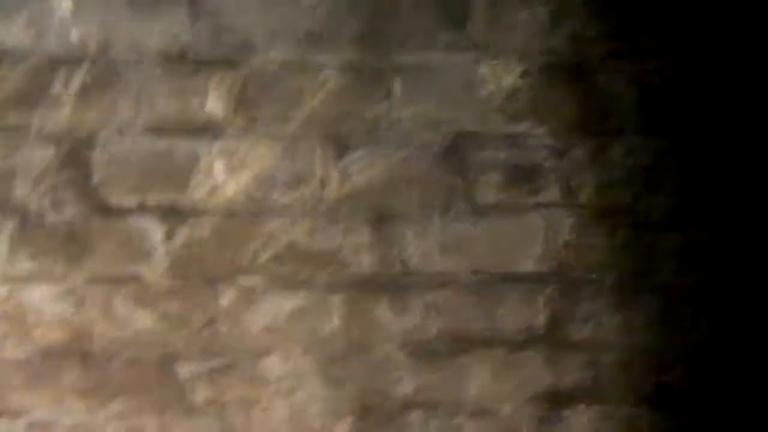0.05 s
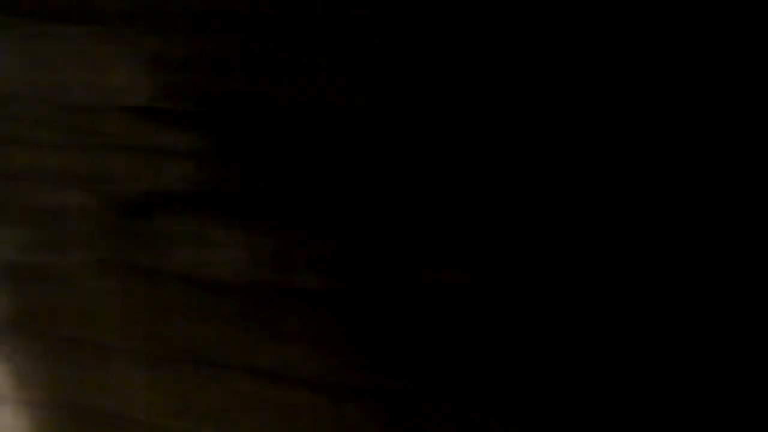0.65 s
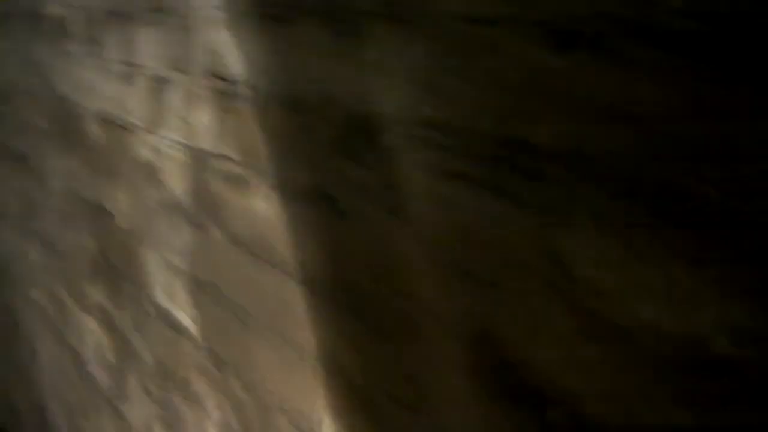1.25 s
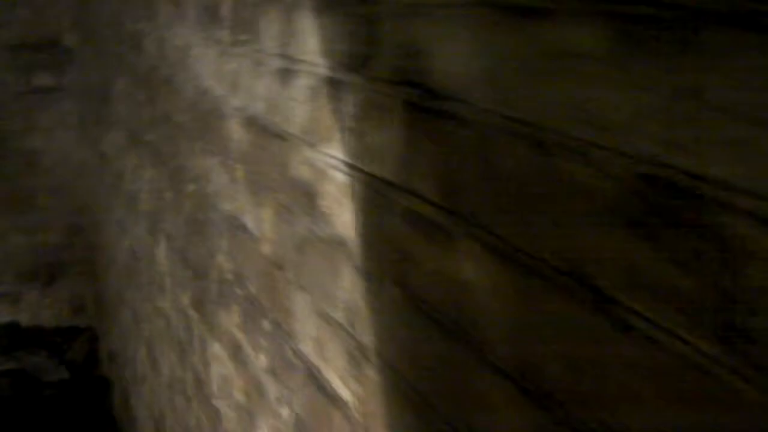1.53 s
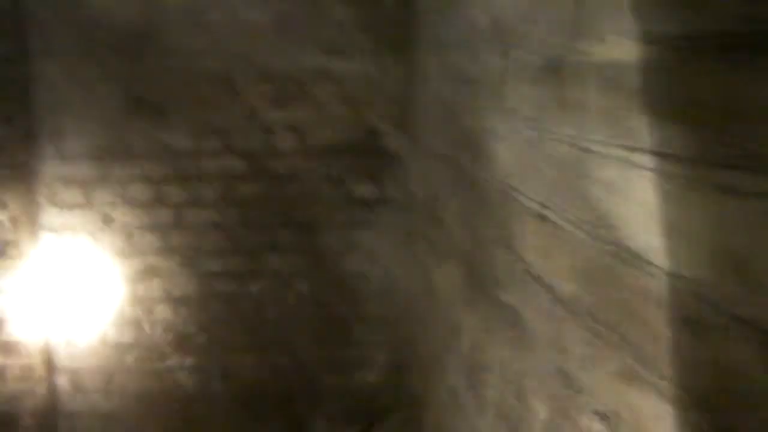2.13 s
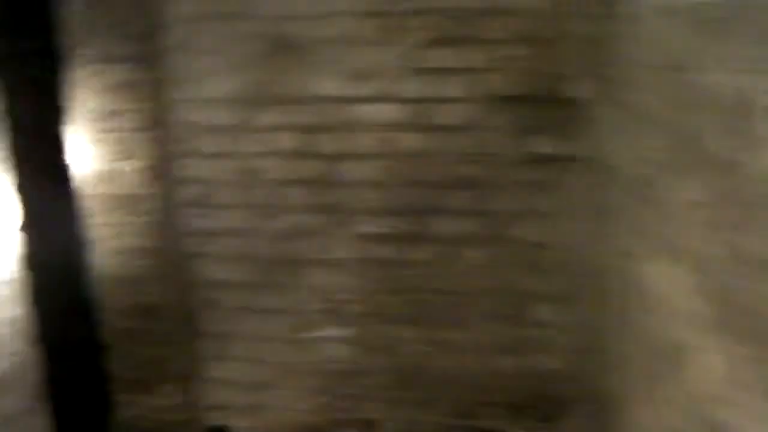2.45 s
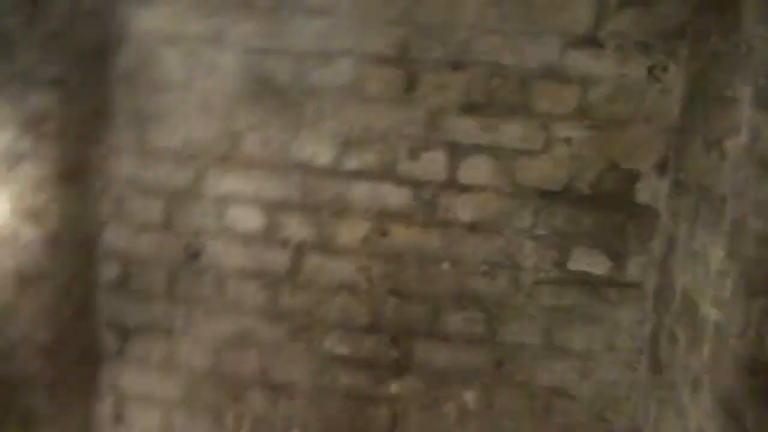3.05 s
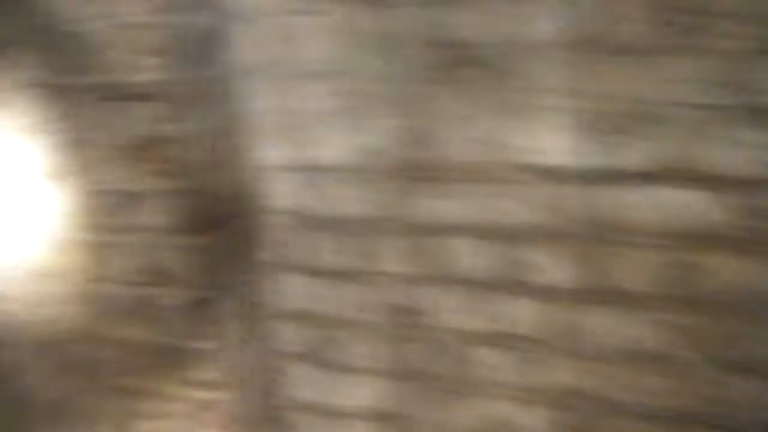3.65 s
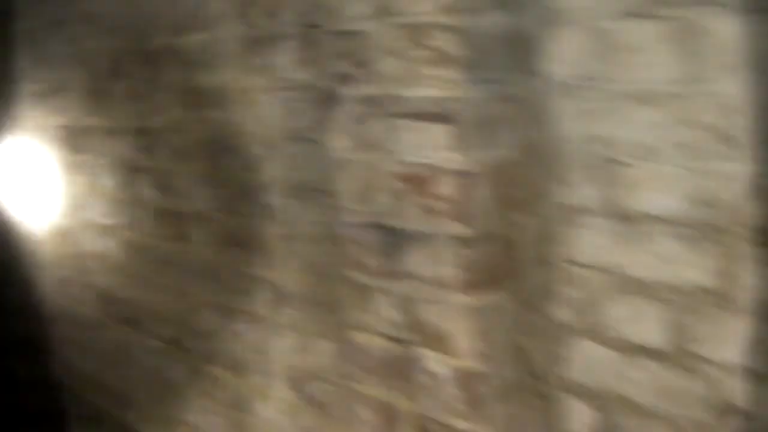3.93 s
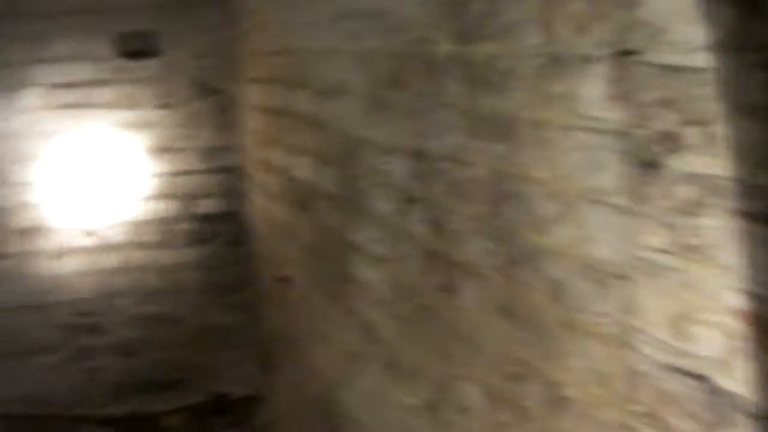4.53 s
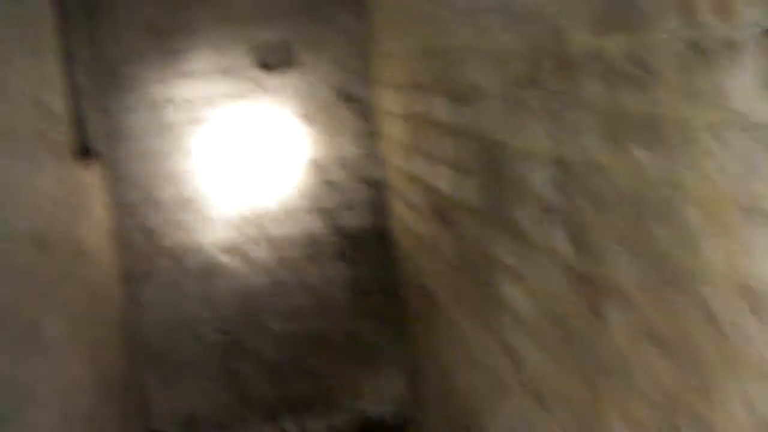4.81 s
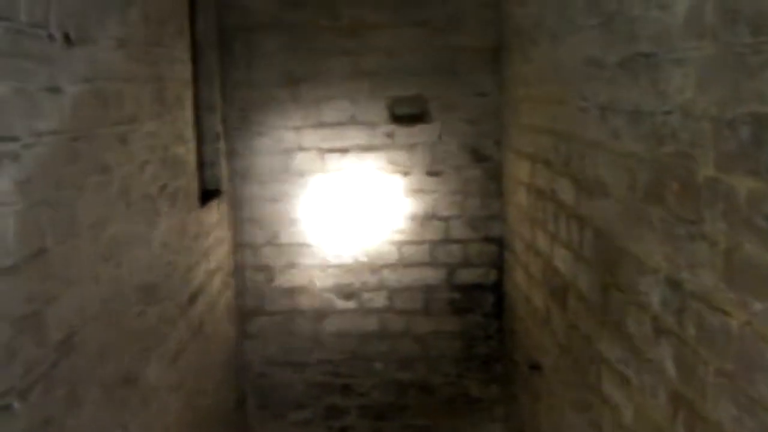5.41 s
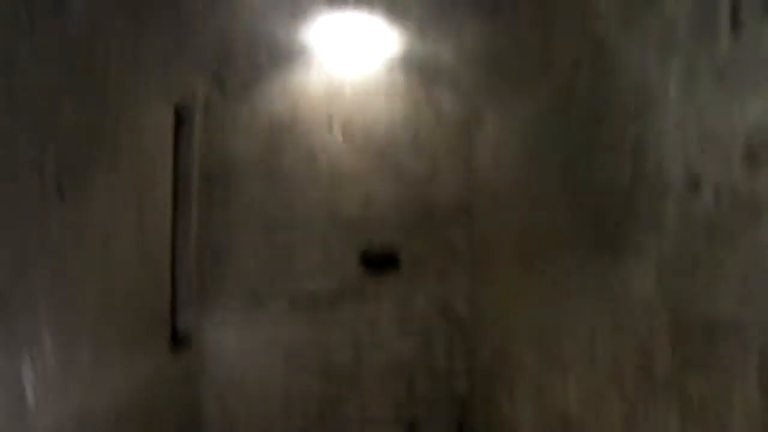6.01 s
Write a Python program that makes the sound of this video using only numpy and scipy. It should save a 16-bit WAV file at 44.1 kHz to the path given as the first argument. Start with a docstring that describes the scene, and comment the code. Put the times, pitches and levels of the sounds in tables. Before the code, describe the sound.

Shoes crush grit and thud softly in an echoing brick passage, a loose brick clacking once among faint knocks and hiss.

```python
"""A slow walk over a gritty floor in a narrow brick tunnel, with faint hiss throughout.
Dull knocks sound first, close to the hand-held microphone. Soles crush the grit, grains snap, shifting
weight rumbles and a hollow hum comes and goes. From 1.5 s the soles also rasp and thud; at 1.8 s a
loose brick clacks once. The steps are heaviest from 2 to 5 s, then lighten as the knocks return.
The vault rings after every step."""
import sys
import numpy as np
from scipy import signal
from scipy.io import wavfile

SR = 44100
rng = np.random.default_rng(int(sys.argv[2]) if len(sys.argv) > 2 else 0)


def to_wav(sig):
    """Store sig (one row per channel, or 1-D mono) as 16-bit WAV at the path in sys.argv[1].

    Samples outside -1..1 are clipped; the rate is SR.
    """
    pcm = np.clip(np.atleast_2d(sig), -1, 1) * 32767
    pcm = np.round(pcm).astype(np.int16)
    wavfile.write(sys.argv[1], SR, pcm.T)  # frames by channels


N = 276066
TIME_S = np.arange(N) / SR
BAND_EDGES_HZ = 22 * 2 ** np.arange(0, 10, .5)

# Stereo image. Each row: frequency in Hz, left-right correlation.
CORRELATION = [(40, 0.73), (300, 0.94), (700, 0.89), (1400, 0.83), (2800, 0.5), (5500, 0.13),
               (10000, -0.017), (15000, 0.0076)]
# Faint steady background hiss, with a dip near 7.9 kHz. Each row: frequency in Hz, relative density in dB.
HISS_SPECTRUM = [(15, -34), (25, 1), (77, 4.5), (260, -12.5), (433, -1), (762, -9.5), (1300, -13),
                 (1530, -13), (4260, -16.5), (7300, -19.5), (7910, -24.5), (11800, -14.5), (15500, -25)]
# Spectra of a step's three parts. Each row: frequency in Hz, relative density in dB.
WEIGHT_SPECTRUM = [(25, -28), (60, -7.5), (100, -5), (150, -1.5), (220, -3), (300, -4), (420, 4),
                   (600, -4.5), (900, -12), (2000, -29)]
SCUFF_SPECTRUM = [(250, -13.5), (500, -3), (850, -0.5), (1300, -1), (2000, -6), (3200, -11.5),
                  (5000, -13.5), (10000, -41)]
CRUNCH_SPECTRUM = [(1200, -51), (2500, 1.5), (4000, -4.5), (6000, -1), (9000, -5), (13000, -5.5),
                   (16000, -26)]
# Soft contacts. Each row: start in seconds, relative level in dB, pitch in Hz, rise in cycles.
CLOSE_KNOCKS = [(.106, -43.5, 470, 1.1), (.124, -44, 645, 1.14), (.514, -46, 390, 0.91),
                (1.066, -40.5, 555, 0.72), (1.285, -37.5, 730, 0.91), (1.293, -31.5, 452, 1.1),
                (1.303, -35.5, 467, 2.4), (1.359, -39, 474, 0.55), (5.432, -41.5, 660, .5),
                (5.475, -44.5, 187, 1.1), (5.477, -33, 395, 1.15), (5.536, -35.5, 600, 0.42),
                (5.544, -34.5, 537, 0.61), (5.879, -38, 590, 0.93), (5.888, -41, 318, 1.2),
                (5.895, -47, 192, 1.24)]
FOOT_THUDS = [(1.561, -28.5, 998, 1.9), (2.163, -27.5, 740, 4.1), (2.271, -25.5, 450, 0.55),
              (2.338, -35, 167, 0.79), (2.762, -38.5, 740, 0.85), (2.922, -27.5, 930, 3.6),
              (2.983, -28.5, 411, 3.2), (3.016, -27.5, 537, 3.1), (3.320, -30, 970, 1.5),
              (3.560, -24, 486, 1.74), (3.593, -23, 223, 0.38), (3.805, -34.5, 460, 1.1),
              (3.926, -31.5, 860, 0.84), (4.079, -28.5, 156, 1.5), (4.082, -26.5, 332, 2.9),
              (4.704, -39, 690, 2.1), (4.786, -30, 630, 2), (4.795, -26, 906, 4), (4.891, -27, 880, 2.2),
              (6.069, -39.5, 667, 1.3)]
# Tunnel tail. Each row: frequency in Hz, T60 in seconds.
TAIL_T60 = [(100, 0.78), (400, 1), (900, 0.58), (2000, 0.5), (5000, 0.45), (14000, 0.88)]
# Standing waves and wall flutter. Each row: frequency in Hz, relative level in dB, T60 in seconds.
VAULT_MODES = [(71.4, 11.5, 0.75), (142.3, 10, 0.5), (153, 2.5, 0.36), (395, -8, 0.56), (440, -20, 0.84),
               (559, -5.5, 0.15), (637, -10, 0.18), (840, -7, 0.1), (1205, -11, 0.086), (1330, -29, 0.48),
               (1950, -9, 0.16), (2070, -15, 0.11), (2950, -15, .08), (3086, -3.5, 0.046),
               (3390, -12, 0.065), (3680, -4, 0.12), (4130, 0, 0.06), (4690, 1.5, 0.082),
               (5570, -1.5, 0.15)]
# Feet shifting between treads. Each row: time in seconds, relative level in dB.
FOOT_SHUFFLE = [(0, -87), (.7, -69.5), (1.1, -62.5), (2.1, -59), (3.4, -58), (4.3, -62), (4.6, -77),
                (5.2, -60.5), (5.85, -66), (6.26, -66)]
# A sole presses into the grit. Each row: time of full load, 20 dB attack and 20 dB release in seconds,
# then relative levels of weight, scuff and crunch in dB.
SOLE_TREADS = [(0.354, 0.041, 0.061, -56, -57.5, -49.5), (.51, 0.15, 0.16, -58.5, -63.5, -63),
               (0.819, 0.084, 0.65, -51, -58, -55.5), (1.072, 0.019, 0.024, -68, -53, -55),
               (1.3, 0.054, 0.069, -54, -75, -61), (1.562, 0.073, 0.078, -43, -47.5, -51),
               (1.695, 0.044, 0.072, -57, -65, -50), (1.805, 0.085, 0.31, -46.5, -50.5, -50),
               (2.168, 0.055, .11, -33, -34, -40), (2.28, 0.056, 0.35, -41, -47, -73),
               (2.36, 0.073, 0.41, -45.5, -54, -52), (2.765, 0.009, 0.13, -41.5, -52.5, -62),
               (2.839, 0.065, 0.09, -43.5, -46, -46.5), (2.929, 0.047, 0.16, -30, -35.5, -42),
               (3.09, 0.23, 0.1, -41, -45, -49), (3.234, 0.072, 0.12, -43, -45.5, -50),
               (3.323, 0.023, 0.092, -40.5, -45.5, -43), (3.557, 0.015, .15, -36, -39.5, -47.5),
               (3.647, 0.072, .14, -36.5, -43.5, -43), (3.931, 0.02, 0.031, -45.5, -45, -50),
               (4.072, 0.022, 0.051, -41.5, -47.5, -55), (4.19, 0.11, 0.23, -46, -44, -38.5),
               (4.255, 0.06, 0.095, -54, -51, -44), (4.335, 0.12, 0.16, -46.5, -60.5, -74),
               (4.635, .02, 0.036, -87, -57.5, -55.5), (4.716, 0.032, 0.45, -43, -55, -44),
               (4.786, 0.076, 0.11, -34, -38.5, -41.5), (4.894, 0.035, 0.12, -54, -42.5, -41),
               (5.0, .06, 0.14, -58, -48, -47.5), (5.07, .03, 0.19, -53, -58, -61.5),
               (5.55, 0.11, .2, -55, -63, -58), (5.68, 0.17, 0.12, -73, -64.5, -58.5),
               (6.072, 0.027, 0.081, -49, -54, -61.5), (6.245, 0.11, .1, -58, -62, -85)]
# Larger grains breaking. Each row: start in seconds, relative level in dB, pitch in Hz,
# decay time in seconds, bandwidth in octaves.
GRAIN_SNAPS = [(0.351, -37, 5400, 0.0012, 2.2), (.953, -37, 4700, 0.0053, 0.43),
               (.9535, -40.5, 2200, 0.0042, .7), (1.473, -38.5, 1990, .002, .9),
               (1.693, -34.5, 4940, 0.0011, 2.1), (2.158, -27.5, 3280, .001, .66),
               (2.1716, -23, 3740, .001, 0.33), (2.368, -39, 7000, 0.0028, 2.1),
               (2.421, -38.5, 7800, .0022, 1.6), (2.484, -38, 7500, 0.0029, 1.1),
               (2.937, -33.5, 3000, .0027, 1.6), (3.0638, -25.5, 2280, 0.0018, 0.54),
               (3.087, -30.5, 3700, 0.0023, .9), (3.1058, -24.5, 2270, .0012, 0.43),
               (3.195, -39.5, 4380, 0.0061, 0.48), (3.319, -45, 6500, .017, 2.6),
               (3.558, -27, 3430, 0.00055, 0.23), (3.6393, -17.5, 4100, 0.0013, 1.15),
               (3.643, -21, 5000, 0.0033, 0.85), (3.6499, -23, 2380, 0.0062, 2.4),
               (3.916, -38.5, 6500, .003, .94), (4.070, -41.5, 3150, 0.01, 1.5),
               (4.366, -39.5, 7000, .0022, 1.4), (4.43, -33, 5800, 0.0011, 1.8),
               (5.030, -27.5, 3300, .0009, 1.4)]
# Swelling resonances. Each row: time of peak in seconds, relative level in dB, pitch in Hz.
WEIGHT_RUMBLES = [(.86, -55, 82), (1.66, -58, 133), (2.23, -45, 126), (3.0, -42.5, 150), (4.195, -45, 117),
                  (4.31, -53, 80), (6.07, -54.5, 99)]
HOLLOW_HUMS = [(1.38, -57, 440), (3.42, -51.5, 145), (5.2, -61, 395), (5.38, -56.5, 410)]
SOLE_RASPS = [(1.51, -58, 2650), (2.865, -52, 7300), (3.16, -53, 2150), (3.24, -57, 4600),
              (3.335, -51, 2520), (3.345, -55, 6100), (3.567, -51, 9000), (4.2, -48, 4300),
              (4.247, -41, 2010), (4.45, -48.5, 1040), (4.775, -45.5, 3830), (4.815, -43.5, 3700),
              (4.9, -45.5, 3550), (5.0, -51.5, 3740)]
# Loose brick. Each row: mode frequency in Hz, relative level in dB, T60 in seconds.
BRICK_MODES = [(223, -21, 0.2), (315, -19.5, 0.24), (450, -6, 0.019), (615, -14, 0.1), (737, -7.5, 0.038),
               (874, -5.5, 0.037), (1040, 3, 0.0088), (1177, -6.5, 0.047), (1370, 0.5, 0.014),
               (1470, -28, 0.087), (1967, -18, 0.096), (2080, 4, 0.0034), (2270, -11.5, 0.047),
               (2650, -9.5, 0.011), (3050, -13.5, 0.0092), (3320, -24.5, 0.059), (4000, -16, 0.0083)]


def from_db(db):
    return 10 ** (np.asarray(db) / 20)


def unit_rms(x):
    return x / np.sqrt(np.mean(x ** 2) + 1e-20)


def at_hz(table, hz):
    """Interpolate on a log-frequency axis."""
    points_hz, values = np.transpose(table)
    return np.interp(np.log(hz), np.log(points_hz), values)


def add(track, start_s, sound):
    i = max(0, round(start_s * SR))
    track[..., i:i + sound.shape[-1]] += sound[..., :N - i]


def bandpass(x, low_hz, high_hz):
    sos = signal.butter(2, [low_hz, min(high_hz, .45 * SR)], "band", fs=SR, output="sos")
    return signal.sosfilt(sos, x + 1e-18)


def highpass(x, hz):
    return signal.sosfilt(signal.butter(2, hz, "high", fs=SR, output="sos"), x + 1e-18)


def stereo_bands(noise):
    """Yield centre in Hz and stereo signal per half octave, from two mid-side pairs."""
    for k, (low_hz, high_hz) in enumerate(zip(BAND_EDGES_HZ, BAND_EDGES_HZ[1:])):
        mid, side = bandpass(noise[k % 2], low_hz, high_hz)
        hz = np.sqrt(low_hz * high_hz)
        alike = at_hz(CORRELATION, hz)
        yield hz, np.sqrt((1 + alike) / 2) * mid + np.sqrt((1 - alike) / 2) * side * [[1], [-1]]


def coloured(noise, spectrum):
    """Shape white noise to a stereo spectrum at about the same rms."""
    centres_hz = np.sqrt(BAND_EDGES_HZ[1:] * BAND_EDGES_HZ[:-1])
    power = np.sum(from_db(at_hz(spectrum, centres_hz)) ** 2 * np.diff(BAND_EDGES_HZ)) * 2 / SR
    return sum(from_db(at_hz(spectrum, hz)) * band for hz, band in stereo_bands(noise)) / np.sqrt(power)


def ringing_noise(hz, octaves, samples):
    """Noise in one resonance, wider in stereo with pitch; rms 1."""
    mid, side = rng.standard_normal((2, samples + 2048))
    stereo = mid + min(hz / 7000, 1) * side * [[1], [-1]]
    edge_ratio = 2 ** (octaves / 2)
    return unit_rms(bandpass(stereo, hz / edge_ratio, hz * edge_ratio)[:, -samples:])


def swells(table, sigma_s, octaves):
    """Resonant noise under Gaussian envelopes."""
    out, t = np.zeros((2, N)), TIME_S[:SR // 2]
    for peak_s, db, hz in table:
        start_s = max(0, peak_s - .25)
        envelope = np.exp(-.5 * ((start_s + t - peak_s) / sigma_s) ** 2)
        add(out, start_s, from_db(db) * ringing_noise(hz, octaves, len(t)) * envelope)
    return out


def soft_blows(table, overtone_ratio, overtone_db, rattle_gain):
    """Soft contacts swell and die within cycles, with one overtone and some rattle."""
    out, t = np.zeros(N), TIME_S[:SR // 8]
    for start_s, db, hz, rise_cycles in table:
        rise_s = rise_cycles / hz
        overtone = np.sin(2 * np.pi * overtone_ratio * hz * t) * np.exp(-t / (2 * rise_s))
        body = np.sin(2 * np.pi * hz * t) + from_db(overtone_db) * overtone
        rattle = unit_rms(bandpass(rng.standard_normal(len(t)), hz / 2, hz * 1.54))
        envelope = t / rise_s * np.exp(1 - t / rise_s)
        add(out, start_s, from_db(db) * highpass((body + rattle_gain * rattle) * envelope, hz / 2))
    return out


def hiss(level_db=-61):
    """Faint steady background noise."""
    return from_db(level_db) * coloured(rng.standard_normal((2, 2, N)), HISS_SPECTRUM)


def knocks():
    """Dull contacts close to the microphone."""
    return soft_blows(CLOSE_KNOCKS, overtone_ratio=1.68, overtone_db=-10, rattle_gain=.32)


def tunnel(x, early_db=-7, early_t60_s=.16, late_db=-11):
    """Near walls return a dense cluster; a longer tail and standing waves follow."""
    t, response = TIME_S[:SR], np.zeros((2, SR))
    for hz, band in stereo_bands(rng.standard_normal((2, 2, SR))):
        early = from_db(early_db) * unit_rms(from_db(-60 * t / early_t60_s))
        late = from_db(late_db) * unit_rms(from_db(-60 * t / at_hz(TAIL_T60, hz)))
        response += band * np.hypot(early, late) * (t > .003) / np.sqrt(SR)
    for hz, db, t60_s in VAULT_MODES:
        mode = from_db(db - 60 * t / t60_s) * np.cos(2 * np.pi * hz * t)
        response += mode * 2 * np.log(1000) / (t60_s * SR)   # gain at resonance independent of T60
    return signal.fftconvolve(x[None], response, axes=1)[:, :N]


def tread_loads(settle_db=-23, settle_20db_s=.53):
    """Weight, scuff and crunch gains: each tread swells, lets go and leaves the grit settling."""
    shuffle_db = np.interp(TIME_S, *np.transpose(FOOT_SHUFFLE))
    power = from_db(shuffle_db + np.array([[-2.5], [-3.5], [-4.5]])) ** 2
    for peak_s, attack_s, release_s, *parts_db in SOLE_TREADS:
        before_s, after_s = np.maximum(peak_s - TIME_S, 0), np.maximum(TIME_S - peak_s, 0)
        rise = from_db(-20 * before_s / attack_s)
        release = from_db(-20 * after_s / release_s)
        settling = from_db(settle_db - 20 * after_s / settle_20db_s)
        power += np.outer(from_db(parts_db), rise * np.hypot(release, settling)) ** 2
    return np.sqrt(power)


def grains(rate_per_s, spread_db, decay_s, rub_gain):
    """Tiny uneven fractures, each a dying burst, over smooth rubbing; rms 1."""
    onsets = rng.random(N) < rate_per_s / SR
    sizes = from_db(spread_db * np.minimum(rng.exponential(1, N), 4))
    energy = signal.lfilter([1], [1, -np.exp(-2 / (decay_s * SR))], onsets * sizes ** 2 + 1e-18)
    envelope = np.sqrt(energy / energy.mean() + rub_gain ** 2)
    return unit_rms(envelope * rng.standard_normal((2, 2, N)))


def chips(rate_per_s=160, low_hz=2300, high_hz=11000, pitches=14, t60_cycles=38, spread_db=1.5):
    """Small chips tick at random times and stereo positions, each ringing briefly; rms 1."""
    out = np.zeros((2, N))
    for hz in np.geomspace(low_hz, high_hz, pitches):
        onsets = rng.random(N) < rate_per_s / pitches / SR
        clicks = onsets * rng.standard_normal((2, N)) * from_db(spread_db * rng.standard_normal(N))
        radius = np.exp(-np.log(1000) * hz / (t60_cycles * SR))
        resonator = [1, -2 * radius * np.cos(2 * np.pi * hz / SR), radius ** 2]
        out += signal.lfilter([1, 0, -1], resonator, clicks + 1e-18)
    return unit_rms(out)


def soles():
    """Weight rolls over coarse crumbs, the sole drags, fine grit is crushed and chips tick."""
    weight, scuff, crunch = tread_loads()
    crumbs = grains(rate_per_s=270, spread_db=4, decay_s=.0042, rub_gain=.92)
    drag = grains(rate_per_s=500, spread_db=2, decay_s=.0021, rub_gain=.55)
    sand = grains(rate_per_s=1500, spread_db=3, decay_s=.0005, rub_gain=.7)
    return (from_db(-2) * coloured(weight * crumbs, WEIGHT_SPECTRUM)
            + from_db(1) * coloured(scuff * drag, SCUFF_SPECTRUM)
            + from_db(-1) * coloured(crunch * sand, CRUNCH_SPECTRUM)
            + from_db(-8) * crunch * chips())


def snaps(crack_db=-6, splinters_db=-1):
    """A grain breaks with one crack; its splinters crumble for milliseconds."""
    out, t = np.zeros((2, N)), TIME_S[:SR // 12]
    for start_s, db, hz, decay_s, octaves in GRAIN_SNAPS:
        edge_ratio = 2 ** (octaves / 2)
        crack = bandpass(signal.unit_impulse(len(t)), hz / edge_ratio, hz * edge_ratio)
        crack *= from_db(crack_db) / abs(crack).max()
        envelope = np.exp(-t / decay_s) * (1 - np.exp(-t * hz))
        splinters = from_db(splinters_db) * ringing_noise(hz, octaves, len(t)) * envelope
        add(out, start_s, from_db(db) * (crack + splinters))
    return out


def rumbles():
    """Low swells as the weight shifts."""
    return from_db(-3) * swells(WEIGHT_RUMBLES, sigma_s=.043, octaves=1.1)


def hums():
    """A hollow hum swells and fades."""
    return from_db(.5) * swells(HOLLOW_HUMS, sigma_s=.08, octaves=.25)


def rasps():
    """The sole catches on grit; friction feeds one resonance."""
    return from_db(-.5) * swells(SOLE_RASPS, sigma_s=.016, octaves=.39)


def thuds():
    """Heel and ball meet the floor."""
    return from_db(-4) * soft_blows(FOOT_THUDS, overtone_ratio=1.81, overtone_db=-4, rattle_gain=.46)


def brick(start_s=1.8067, gain_db=-18.5, low_cut_hz=270):
    """A brick tips underfoot; one hard contact rings all modes. So small a body radiates no bass."""
    out, t = np.zeros(N), TIME_S[:SR // 2]
    for k, (hz, db, t60_s) in enumerate(BRICK_MODES):
        envelope = from_db(gain_db + db - 60 * t / t60_s)
        add(out, start_s, (-1) ** k * envelope * np.sin(2 * np.pi * hz * t))
    return highpass(out, low_cut_hz)


def scene():
    """Feet, knocks and brick ring in the tunnel, the brick most; hiss and hums stay dry."""
    feet = soles() + snaps() + thuds() + rasps() + rumbles()
    near = knocks()
    clack = brick()
    background = hiss() + hums()
    echo = tunnel(feet.mean(axis=0) + from_db(8.5) * clack + from_db(-.5) * near)
    return feet + near + clack + echo + background


def record(dry, notch_hz=7900, notch_q=28, cutoff_hz=15650):
    """Microphone: right side slightly brighter, one narrow notch, steep top cut."""
    treble = signal.lfilter([.85, -.85], [1, -.7], dry)
    tilted = dry + .06 * treble * [[-1], [1]]
    notched = signal.lfilter(*signal.iirnotch(notch_hz, notch_q, fs=SR), tilted)
    return signal.sosfilt(signal.ellip(10, .1, 70, cutoff_hz, fs=SR, output="sos"), notched)


dry = scene()
out = record(dry)
to_wav(out)
```